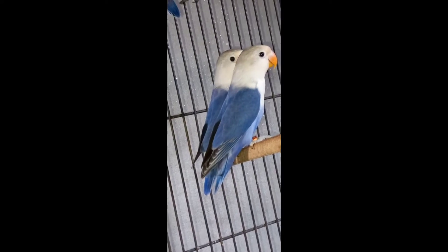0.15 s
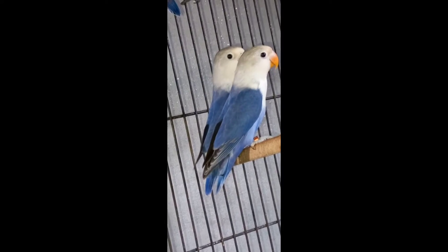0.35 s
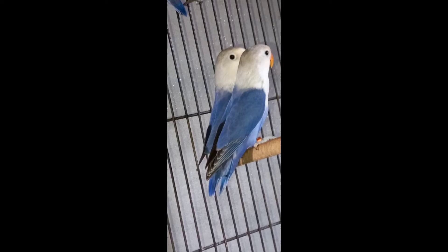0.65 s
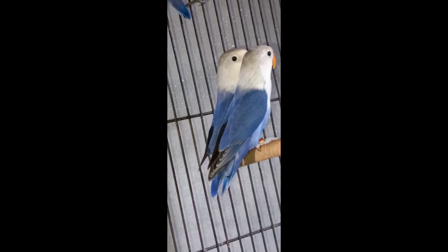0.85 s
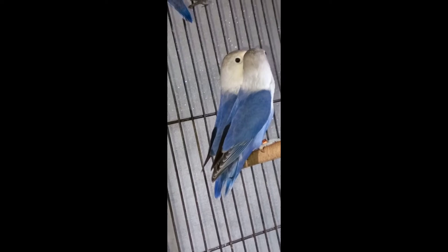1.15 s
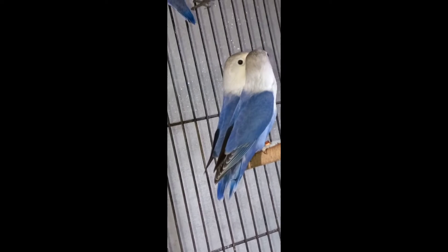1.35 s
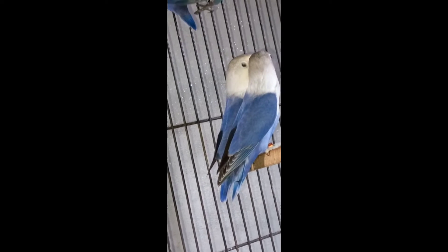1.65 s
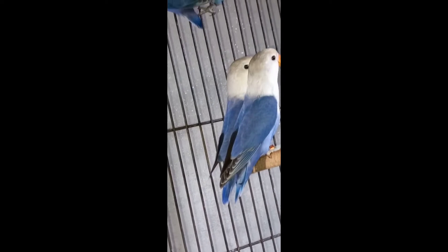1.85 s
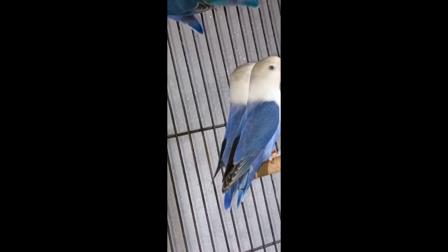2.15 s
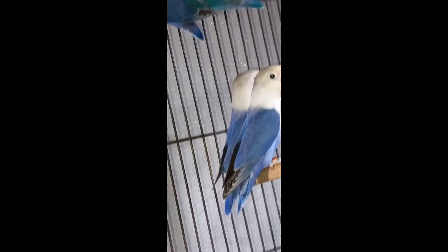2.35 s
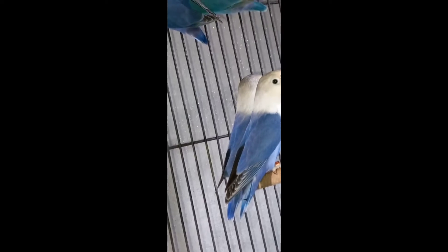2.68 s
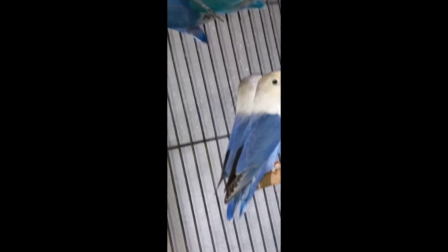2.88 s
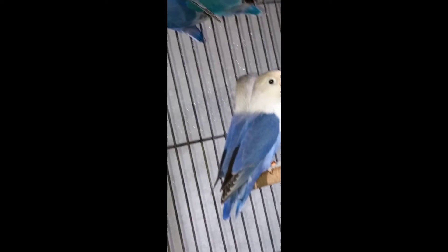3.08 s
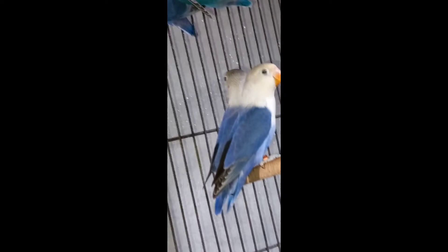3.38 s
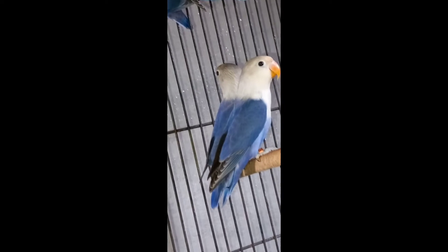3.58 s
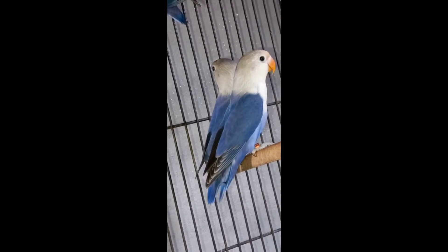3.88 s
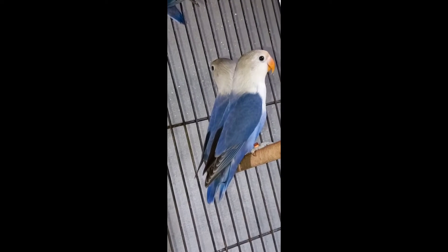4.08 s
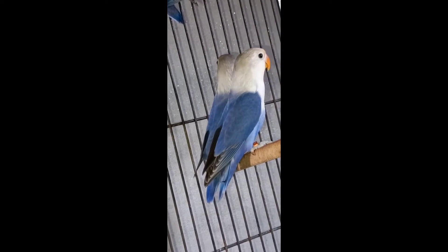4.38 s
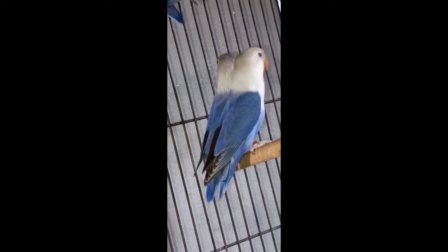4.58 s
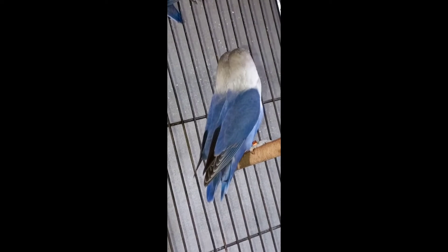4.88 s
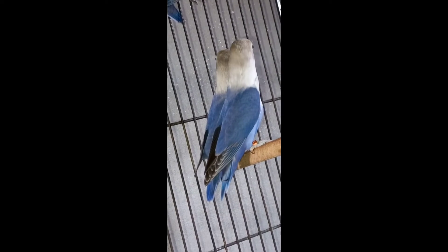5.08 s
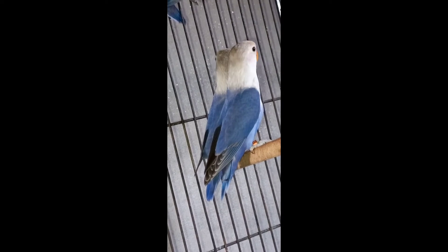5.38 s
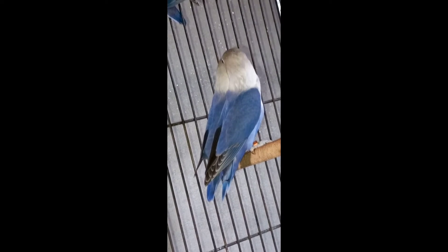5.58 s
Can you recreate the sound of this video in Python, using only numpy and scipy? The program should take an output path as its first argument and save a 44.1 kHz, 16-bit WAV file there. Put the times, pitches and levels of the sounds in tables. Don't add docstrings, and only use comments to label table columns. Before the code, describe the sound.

A close stereo pickup of small parrots in wire cages inside a hard-walled room. Low, faint room hum runs throughout, with soft feather rustles. At about 0.35 s comes a tight cluster of sharp, clicking chirps, and at 1.03 s another, louder and piercing, followed by a brief raspy call near 1.3 s. Each rings off in a bright, short tail. Quiet rustling fills the gap until a short chirp at 2.4 s. From 2.6 to 3.3 s harsh, fluttering squawks crowd together, strongest near 3.0 s, while wing movement thuds low. From 3.4 s shrill, reedy syllables become dense, rapid chatter, leaning right with some calls shifting left. Between 3.75 and 4.8 s another bird rattles steadily on one pitch underneath, softening later. Loud chirps at 4.04 and 4.3 s puff the left microphone. Chatter continues, a little more loosely, to the end at about 5.7 s.

```python
import sys
import numpy as np
from scipy import signal
from scipy.fft import rfft, irfft
from scipy.io import wavfile
from scipy.ndimage import uniform_filter1d, minimum_filter1d

SR = 44100
rng = np.random.default_rng(int(sys.argv[2]) if len(sys.argv) > 2 else 0)


def magnitude_from_level(level_db):
    exponent = np.asarray(level_db, float) / 20
    return 10 ** exponent


def wav_record(signal):
    frames = np.transpose(np.atleast_2d(signal))
    bounded = np.clip(frames, -1, 1)
    quanta = np.round(bounded * 32767).astype(np.int16)
    wavfile.write(sys.argv[1], SR, quanta)


N = 252693

# (time [s], peak level [dB], pitch [Hz], beak resonance [Hz], length [s])
CALLS = [(0.346, -11.5, 2000, 3950, 0.012), (0.3514, -3, 2123, 4300, 0.01),
         (0.356, -10.5, 1990, 5830, 0.011), (0.3625, -4.5, 2762, 5700, 0.015),
         (1.025, -19, 2113, 2156, 0.012), (1.032, -1, 2361, 4800, 0.012), (1.038, -7.5, 2140, 5860, 0.032),
         (1.052, -16, 2500, 5100, 0.03), (1.287, -29, 3537, 3400, 0.096), (1.33, -17, 2352, 4400, 0.021),
         (1.342, -15.5, 2066, 5430, 0.03), (1.359, -14, 2102, 6150, 0.023), (2.422, -17, 2446, 4680, 0.052),
         (3.158, -15, 2484, 4900, 0.023), (2.427, -25.5, 2334, 2700, 0.043),
         (3.029, -15.5, 2773, 5500, 0.076), (3.162, -7.5, 3260, 5850, 0.034),
         (3.166, -10.5, 2754, 5700, 0.058), (3.224, -15.5, 3180, 6600, 0.089),
         (3.849, -17, 2920, 6000, 0.15), (4.103, -16.5, 2844, 5570, 0.12), (4.458, -15, 2536, 5400, 0.059),
         (4.546, -16, 2622, 5000, 0.12), (4.03, -4.5, 2363, 5370, 0.011), (4.041, 1, 2200, 6000, 0.014),
         (3.543, -14.5, 2500, 5500, 0.049), (4.963, -12.5, 2235, 4470, 0.011),
         (5.013, -18, 2250, 4480, 0.01), (5.327, -15, 2180, 4400, 0.021), (4.302, -4, 2500, 4800, 0.015),
         (4.304, -8.5, 2122, 6100, 0.048), (4.573, -18.5, 2755, 4960, 0.13),
         (4.698, -16.5, 2801, 5600, 0.066), (5.407, -16, 2752, 5700, 0.08)]
# (time [s], peak level [dB], pitch [Hz], glide [semitones], beak resonance [Hz])
SQUAWK_CALLS = [(2.57, -25.5, 2510, -0.7, 4030), (2.62, -27.5, 2917, -1, 4000),
                (2.678, -24.5, 2246, 2, 4370), (2.801, -21, 2550, 3, 4300), (2.834, -15, 2850, 0.9, 5040),
                (2.93, -19, 2653, 1.5, 3060), (2.951, -14.5, 2912, 0.1, 5120), (3.028, -7, 3323, 1.4, 3250),
                (3.09, -14, 3563, 0.5, 4300), (3.165, -28, 2390, -2, 5240), (3.241, -13, 2716, -1.5, 5740),
                (3.304, -35, 2442, 1, 2400)]
# (time [s], peak level [dB], second harmonic [Hz], left minus right [dB])
CHATTER_CALLS = [(3.3958, -21, 4310, -14), (3.4172, -20.5, 4120, -1.5), (3.473, -14, 4178, -10),
                 (3.4951, -18.5, 4220, 1), (3.5499, -11.5, 4724, -12), (3.5904, -18, 4840, 4),
                 (3.6233, -11, 4450, -13.5), (3.6735, -20, 4280, -2), (3.7033, -12, 4530, -16),
                 (3.7545, -7.5, 4092, -11.5), (3.8902, -8.5, 4250, -9), (3.9325, -10.5, 4900, -11.5),
                 (3.9715, -10.5, 4200, -7), (4.0143, -7.5, 4644, -4), (4.0461, -12, 4704, 0),
                 (4.0962, -8, 4510, -7), (4.1175, -14, 4424, -2), (4.1759, -10.5, 4660, -2),
                 (4.2211, -9, 4220, -5), (4.2659, -5, 4880, 1), (4.3068, -16, 5060, -7),
                 (4.3912, -9, 4280, -3), (4.4415, -8, 4477, 0), (4.4909, -12, 4365, 0),
                 (4.5198, -18, 4420, -8), (4.549, -11, 4315, -1), (4.5838, -8, 4420, -9),
                 (4.6248, -15, 4430, 1), (4.6594, -10.5, 4230, -3.5), (4.7517, -18, 4126, -6),
                 (4.7906, -12.5, 4310, 6), (4.8345, -12, 4555, -7), (4.8607, -12.5, 4473, -4),
                 (4.9059, -16, 4220, 4), (4.9288, -12, 4533, -5.5), (4.9665, -19.5, 4450, -12.5),
                 (5.0185, -24, 4530, 5), (5.057, -17, 4530, 3), (5.087, -15.5, 4800, 7),
                 (5.215, -10.5, 4420, 1.5), (5.27, -16.5, 4625, 1), (5.306, -12.5, 4420, 1),
                 (5.326, -22, 4253, -15), (5.3494, -18, 4450, -6.5), (5.4188, -8.5, 4674, -9),
                 (5.4787, -24, 5170, 1), (5.55, -12.5, 4430, 4), (5.5743, -18, 4510, -22),
                 (5.5987, -21.5, 4880, 10), (5.69, -47, 4560, 10)]
# (time [s], peak level [dB], second harmonic [Hz],
# left minus right [dB])
MORE_CHATTER_CALLS = [
    (3.4382, -19.5, 4340, 3),
    (4.0782, -17, 4670, -8),
    (4.3337, -17.5, 4280, 5),
    (4.473, -7.5, 4360, -8),
    (4.7128, -18, 4260, -10),
    (4.8151, -12, 4400, -2),
    (5.1341, -18.5, 4395, 5),
    (5.2047, -15.5, 4700, -14),
    (5.4447, -17, 5020, -15),
]
# (start [s], end [s], peak level [dB], second harmonic [Hz])
RATTLE_RUNS = [
    (3.754, 3.92, -10, 4152),
    (3.931, 4.2, -8, 4290),
    (4.212, 4.5, -13.5, 4353),
    (4.51, 4.8, -15, 4327),
]
# (time [s], facing left minus right [dB], shrillness [dB],
# warble depth [share of pitch], fundamental level [dB])
FLOCK_MOOD = [(.35, -11, 3, 0.031, -12.5), (.365, -10, 11, 0.022, -23), (1.03, -3.5, 8.5, 0.024, -20.5),
              (1.045, -3.5, -10.5, 0.038, -17), (1.29, -8.5, -14, 0.073, 6), (1.34, -4, 7, 0.036, -2.5),
              (2.43, -3.5, 2, 0.066, -16), (2.7, -6, 3, 0.084, 16), (2.85, -2.5, 1.5, 0.043, 3.5),
              (3.17, -3, 5, 0.047, -21), (3.24, -5.5, 1, 0.031, -41), (3.4, -8, 11.5, 0.035, 15),
              (3.56, 0, 6.5, 0.032, 5), (3.72, 1.5, 2.5, 0.0246, 0), (3.77, -4, 5.5, 0.035, -8),
              (4.75, -5, 4.5, 0.031, -8), (4.83, -11, 1.5, 0.016, 0), (5.38, -11.5, 5, 0.033, -18),
              (5.41, -6, 4.5, 0.05, -37), (5.56, -10.5, 1.5, 0.029, 1)]
# (time [s], level [dB])
BREATH = [(.36, -6.5), (1.03, -6), (1.05, 27), (1.3, 29), (1.345, 10), (2.43, 5.5), (3.0, -5), (3.4, -25),
          (3.8, 4), (4.7, 0), (5.3, -0.5), (5.6, -3)]
# (time [s], level [dB])
DISTANCE = [(.35, -5), (1.04, -1.5), (1.34, -4), (2.43, 1.5), (2.9, 2), (3.17, -3.5), (3.5, 0), (4.0, -2),
            (4.6, -1.5), (5.1, 0.5), (5.6, 0)]
# (time [s], peak level [dB], length [s], centre [Hz], spread [octaves])
FEATHERS = [(0.187, -40.5, 0.065, 10200, 1.6), (1.007, -46, 0.063, 11000, 0.25),
            (2.426, -27, 0.0048, 10000, 1.3), (1.285, -40.5, 0.065, 11330, 0.54),
            (1.718, -50, 0.14, 3100, 1.18), (1.816, -53.5, 0.05, 12800, 0.32),
            (1.906, -59.5, 0.094, 11000, 0.34), (2.684, -26, 0.011, 5100, 1),
            (2.038, -47, 0.039, 3040, 1.14), (2.12, -63, 0.045, 10600, 0.32),
            (2.23, -57.5, 0.25, 13000, 0.7)]
# (frequency [Hz], time to fade by 60 dB [s])
WALL_FADE = [(1000, 0.76), (2640, 0.72), (6960, 0.4), (13000, 0.32)]
# (time [s], peak level [dB], frequency [Hz], length [s])
PORT_PUFFS = [
    (1.043, -30, 90, .045),
    (4.046, -30, 130, .04),
    (4.310, -25, 130, .04),
    (5.425, -38, 80, .05),
    (4.595, -44, 70, .04),
]
# (time [s], level [dB])
STIRRED_AIR = [(0.0, -49), (0.108, -48.5), (0.51, -48.5), (0.809, -52), (1.047, -52.5), (1.26, -52.5),
               (1.6, -53), (1.791, -51), (2.221, -49.5), (2.47, -45.5), (2.62, -44), (2.95, -36.5),
               (3.171, -38.5), (3.42, -46), (3.622, -44), (3.91, -52.5), (4.802, -51.5), (5.73, -55.5)]
# (stir level [dB], rush level [dB])
UPPER_RUSH = [(-52, -86.5), (-52.5, -65), (-30, -37.5)]
# (frequency [Hz], level [dB per Hz])
ROOM_HISS = [(754, -102.5), (3070, -8), (6360, -16.5), (15000, -19.5)]
# (frequency [Hz], width [Hz], level [dB])
ROOM_MODES = [(65.5, 25, 1), (126.6, 8.4, 19), (189.7, 13, 15.5), (269, 73, 4), (482, 73, 4.5)]
# (frequency [Hz], likeness [0 to 1])
LIKENESS = [(60, 0.96), (240, 1), (950, 0.017), (3760, 0.045), (14900, 0.14)]
# (frequency [Hz], level [dB])
MIC_TONE = [(100, -24.5), (1500, 5.5), (3000, 4), (6700, 4), (7150, 0), (8400, -5), (9400, -3),
            (10800, 2.5), (12000, 4), (13000, -1), (14200, -8.5), (15400, -30.5)]

SAG_SEMITONES_PER_S = -6.5
WILD_PER_S = 3.2
HALF_DB, HALF_DB_PER_DOUBLING = -9.5, 5.5
SQUAWK_SHARE = 0.856
SYLLABLE_S, LONGEST_S, VOICED_SHARE = 0.034, 0.15, 0.91
CHATTER_DB, TIRING_DB_PER_S, UNEVEN_DB, UNEVEN_PITCH = 0.5, -23, 1.5, 0.0123
FLICK = 0.025
USUAL_HZ, LINGER = 4420, 0.35
TURN_GAIN, USUAL_PAN_DB = 0.79, -5
RATTLE_S, RATTLE_SHARE = 0.019, 0.74
RATTLE_UNEVEN_DB, RATTLE_UNEVEN_PITCH = 3, 0.016
BEAT_DB, BEAT_GROWTH = -55, 1.6


def evened(x):
    return x / np.sqrt(np.mean(x ** 2) + 1e-20)


def read(points, hz):
    f, value = np.transpose(points)
    return np.interp(np.log(hz + 1), np.log(f + 1), value)


def at_time(rows, s):
    times, *columns = np.transpose(rows)
    return [np.interp(s, times, c) for c in columns]


def add(mix, s, sound):
    part = mix[..., round(s * SR):][..., :sound.shape[-1]]
    part += sound[..., :part.shape[-1]]


def shaped(x, gain):
    size = x.shape[-1]
    return irfft(rfft(x) * gain(np.fft.rfftfreq(size, 1 / SR)), size)


def bell(hz, octaves):
    return lambda f: np.exp(-(np.log2(f / hz + 1e-6) / octaves) ** 2 / 2)


def wander(size, hz):
    seed = rng.standard_normal(8192)
    return evened(shaped(seed, lambda f: np.exp(-(f / hz) ** 2)))[:size]


def tilted(left_db, right_db):
    return magnitude_from_level(np.array([[left_db], [right_db]]))


def syllable(s, db, hz, glide, beak_hz, length, throb, flick=0, wild=0):
    t = np.arange(int(np.clip(length, 0.006, 0.18) * SR)) / SR
    size = len(t)
    u = t / t[-1]
    pan, shrill_db, warble, base_db = at_time(FLOCK_MOOD, s)
    half_db = HALF_DB + HALF_DB_PER_DOUBLING * np.log2(abs(warble) / 0.029)
    warble = warble * (1 + wild)

    beat = np.cumsum(250 * (1 + 0.22 * wander(size, 60))) / SR + rng.random()
    pitch = hz * 2 ** (glide * (u - 0.5) / 12) * (1 + flick * np.exp(-t / 0.017))
    sway = np.sin(2 * np.pi * beat) + 0.4 * wander(size, 45) + 0.3 * wander(size, 700)
    pitch = pitch * (1 + warble * sway)
    turns = np.cumsum(pitch) / SR

    k = np.arange(2, 15)[:, None] / 2
    f = k * pitch
    beak = 1 / (1 + ((f - beak_hz) / 900) ** 2)
    folds = magnitude_from_level(base_db * (k == 1) + 1.0 * (k == 3) + shrill_db * (f > 8000)) * magnitude_from_level(-19.5)
    uneven = np.where(k % 1 > 0, magnitude_from_level(half_db) * wander(size, 990), 1)
    waves = np.cos(2 * np.pi * k * turns + k * k)
    voice = ((beak + folds) * uneven * (f < 16000) * waves).sum(0)
    voice = evened(voice) + magnitude_from_level(-22.5) * rng.standard_normal(8192)[:size]
    rasp = evened(shaped(rng.standard_normal(8192), bell(12400, 0.28)))[:size]
    voice = voice + magnitude_from_level(shrill_db - 17.0 + at_time(BREATH, s)[0]) * rasp

    pulse = 1 + throb * (np.cos(2 * np.pi * beat + 0.13) + 0.5 * wander(size, 110))
    shape = np.minimum(t / 0.005, 1) * np.minimum((t[-1] - t) / 0.004, 1) * magnitude_from_level(-4 * u)
    sound = magnitude_from_level(db - 13.0) * voice * pulse * shape
    lag = rng.integers(4, 36)
    ports = np.array([np.pad(sound, (lag, 48 - lag)), np.pad(sound, (30, 18))])
    return ports * tilted(pan / 2, -pan / 2)


def single_calls(out):
    for s, db, hz, beak_hz, length in CALLS:
        wild = WILD_PER_S * max(length - SYLLABLE_S, 0)
        glide = SAG_SEMITONES_PER_S * length
        add(out, s, syllable(s, db, hz, glide, beak_hz, length, throb=0.37, wild=wild))


def squawks(out):
    gaps = np.minimum(np.diff([r[0] for r in SQUAWK_CALLS], append=N / SR), 0.14)
    for row, gap in zip(SQUAWK_CALLS, gaps):
        add(out, row[0] - 0.004, syllable(*row, SQUAWK_SHARE * gap, throb=0.94))


def chatter(out):
    rows = sorted(CHATTER_CALLS + MORE_CHATTER_CALLS)
    lengths = np.minimum(np.diff([r[0] for r in rows], append=N / SR), LONGEST_S)
    luck = np.clip(rng.standard_normal((len(rows), 8, 2)), -2, 2)
    for (start, db, hz, pan), length, chance in zip(rows, lengths, luck):
        count = max(round(length / SYLLABLE_S), 1)
        turn_db = TURN_GAIN * (pan - USUAL_PAN_DB)
        for k in range(count):
            since = k * length / count
            level_db = db + CHATTER_DB + TIRING_DB_PER_S * since + UNEVEN_DB * chance[k, 0] * (k > 0)
            note = USUAL_HZ + LINGER ** k * (hz - USUAL_HZ)
            note = note * (1 + UNEVEN_PITCH * chance[k, 1] * (k > 0))
            sound = syllable(start, level_db, note / 2, 0, note * (1 + FLICK),
                             VOICED_SHARE * length / count, throb=0.34, flick=FLICK)
            add(out, start + since - 0.004, sound * tilted(turn_db / 2, -turn_db / 2))


def flock():
    out = np.zeros((2, N))
    single_calls(out)
    squawks(out)
    chatter(out)
    return out


def rattle():
    out = np.zeros((2, N))
    for start, end, db, hz in RATTLE_RUNS:
        times = np.arange(start, end, RATTLE_S)
        for s, chance in zip(times, np.clip(rng.standard_normal((20, 3)), -2, 2)):
            note = hz * (1 + RATTLE_UNEVEN_PITCH * chance[1])
            level_db = db + RATTLE_UNEVEN_DB * chance[0]
            bead = syllable(s, level_db, note / 2, 0, note, RATTLE_SHARE * RATTLE_S, throb=0.48)
            add(out, s + 0.0028 * chance[2], bead)
    return out


def rustles():
    out = np.zeros((2, N))
    t = np.arange(8192) / SR
    for s, db, length, hz, spread in FEATHERS:
        noise = rng.standard_normal((2, 8192)) * magnitude_from_level(2.0 * wander(8192, 190))
        noise = evened(shaped(noise, bell(hz, spread)))
        add(out, s, magnitude_from_level(db - 2.5) * noise * np.minimum(t / 0.001, 1) * np.exp(-(t / length) ** 2))
    return out


def puffs():
    out = np.zeros((2, N))
    t = np.arange(4096) / SR
    for s, db, hz, length in PORT_PUFFS:
        noise = rng.standard_normal(4096) + 1.1 * rng.standard_normal((2, 4096))
        noise = shaped(noise, lambda f: (f / hz) ** 3 / (1 + (f / hz) ** 4.73))
        age = t / length * 4
        add(out, s, magnitude_from_level(db - 6.0) * evened(noise) * age * np.exp(1 - age))
    return out * tilted(5.5, -13)


def room(x):
    out = np.zeros((2, N))
    turn = np.arange(N) / SR * 7.3
    for k in range(3):
        taps = np.zeros((2, SR))
        at = np.arange(200, SR - 20, 20) + rng.integers(0, 20, (2, (SR - 201) // 20))
        np.put_along_axis(taps, at, rng.choice([-1., 1.], at.shape), 1)
        hz, t, z = signal.stft(taps, SR, nperseg=256)
        fade = magnitude_from_level(-60 * t / read(WALL_FADE, hz)[:, None])
        tail = signal.istft(z * fade, SR, nperseg=256)[1]
        share = np.sqrt(2 / 3) * np.cos(np.pi * (turn + k) / 3)
        out += signal.fftconvolve((x * share)[None], tail / np.linalg.norm(tail[0]), axes=1)[:, :N]
    return out


def patchy_noise():
    frames, hz = N // 256 + 5, np.fft.rfftfreq(1024, 1 / SR)
    a, b, c, d, patches = rng.standard_normal((frames, 513, 5)).T
    patches = evened(uniform_filter1d(uniform_filter1d(patches, 6, 0), 5, 1))
    same = np.clip(read(LIKENESS, hz), -1, 1)[:, None]
    left = a + 1j * b
    right = same * left + np.sqrt(1 - same ** 2) * (c + 1j * d)
    z = np.array([left, right]) * magnitude_from_level(2.17 * patches)
    return signal.istft(z, nperseg=1024, noverlap=768)[1][:, :N]


def mode_gain(f):
    modes = 0.031 + sum(magnitude_from_level(db) / np.hypot(1, 2 * (f - m) / w) for m, w, db in ROOM_MODES)
    return modes * (f ** 2 / (f ** 2 + 54 ** 2)) ** 4 / np.hypot(1, (f / 620) ** 4)


def air():
    noise = patchy_noise()
    low = evened(shaped(noise, mode_gain))
    upper = evened(shaped(noise, bell(1000, 0.6)))
    hiss = evened(shaped(noise, lambda f: magnitude_from_level(read(ROOM_HISS, f)) * (f > 700)))
    thud = evened(shaped(noise, bell(74, 0.33)))

    t = np.arange(N) / SR
    s, stir_db = np.transpose(STIRRED_AIR)
    low_db = np.interp(t, s, stir_db)
    upper_db = np.interp(t, s, np.interp(stir_db, *np.transpose(UPPER_RUSH)))
    flaps_db = 2.5 * np.resize(wander(8192, 40), N)
    thud = thud * magnitude_from_level(BEAT_DB + BEAT_GROWTH * (low_db + 42.5) + flaps_db)
    moving = thud + low * magnitude_from_level(low_db) + upper * magnitude_from_level(upper_db)
    return moving * tilted(1.2, -1.2) + hiss * (magnitude_from_level(-84.5) + magnitude_from_level(np.minimum(upper_db, -62) + 1.0))


def mic_gain(f):
    side = np.array([[-1.5], [1.5]]) * np.clip(np.log2(f / 4000 + 1e-6), -1, 1)
    return magnitude_from_level(read(MIC_TONE, f) + side)


def scene():
    near = flock() + rattle() + rustles()
    to_walls = near.mean(0) * magnitude_from_level(at_time(DISTANCE, np.arange(N) / SR)[0])
    wet = room(to_walls) * tilted(0, 0) * np.array([[0.5], [1.5]])
    return shaped(near + wet, mic_gain) + air() + puffs()


def outline(z, size):
    power = uniform_filter1d(abs(z) ** 2, size, 1)
    return np.sqrt(abs(uniform_filter1d(power, size=5, axis=2))) + 1e-9


def rebuilt_treble(x):
    z = signal.stft(x, SR, nperseg=256, noverlap=192)[2]
    moved = np.roll(z, 44, axis=1)
    moved = moved / outline(moved, size=3) ** 0.5
    noise = signal.stft(rng.standard_normal(x.shape), SR, nperseg=256, noverlap=192)[2]
    fill = moved / outline(moved, size=15) + magnitude_from_level(-6) * evened(abs(noise)) * noise / abs(noise)
    high = np.arange(z.shape[1])[:, None] >= 50
    z = np.where(high, magnitude_from_level(0.5) * fill * outline(z, size=9), z)
    return signal.istft(z, SR, nperseg=256, noverlap=192)[1][:, :N]


def starved(x, under_db, valley_db, quiet_db, fickle_db):
    hz, t, z = signal.stft(x, SR, nperseg=1024, noverlap=768)
    band = np.maximum(np.log2(1 + hz / 2500) * 13, hz / 350 - 6).astype(int)
    power = np.array([(abs(z[:, band == b]) ** 2).mean((0, 1)) for b in range(band.max() + 1)])
    level = 10 * np.log10(uniform_filter1d(power, size=7, axis=1) + 1e-20)
    luck = evened(uniform_filter1d(rng.standard_normal(level.shape), size=12, axis=1))
    neighbour = -minimum_filter1d(-level, size=9, axis=0)
    loudest = level.max(0) - under_db
    spared_db = np.interp(np.arange(len(level)), [9, 11, 24, 25, 28, 30], [7, 1, 1, -4, -4, 3])[:, None]
    hidden = np.maximum(loudest, neighbour - valley_db) - spared_db + fickle_db * luck
    bar = np.maximum(hidden, quiet_db + luck)
    kept = (level > bar)[band] | (hz[:, None] < 900)
    return signal.istft(z * kept, SR, nperseg=1024, noverlap=768)[1][:, :N]


def band_limit(x):
    return signal.sosfilt(signal.butter(12, 15540, fs=SR, output="sos"), x)


def record(dry):
    soft = 0.85 * np.tanh(dry / 0.85)
    thinned = starved(rebuilt_treble(soft), under_db=31, valley_db=20.3, quiet_db=-103, fickle_db=3.5)
    edge = signal.firwin(511, 15750, window=("kaiser", 9), fs=SR)[None]
    mix = signal.oaconvolve(thinned, edge, "same")
    return band_limit(mix)


dry = scene()
out = record(dry)
wav_record(out)
```